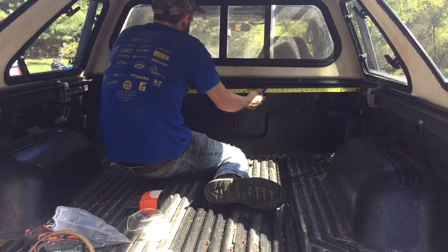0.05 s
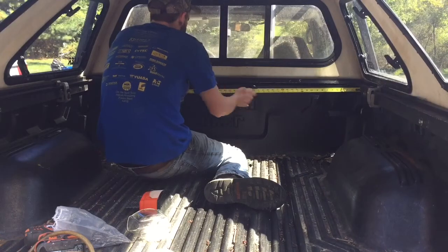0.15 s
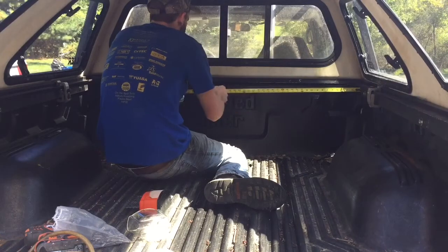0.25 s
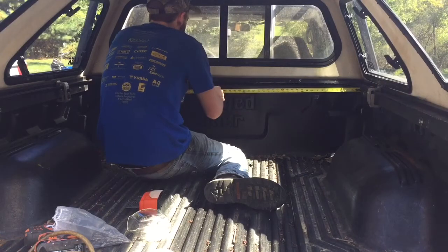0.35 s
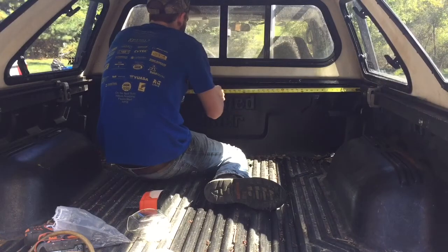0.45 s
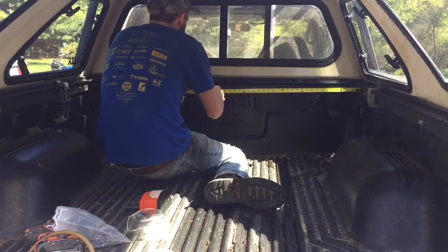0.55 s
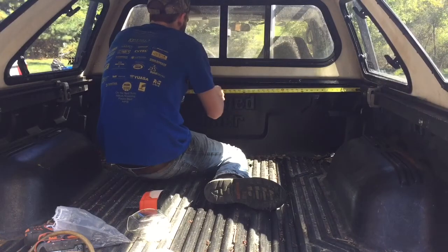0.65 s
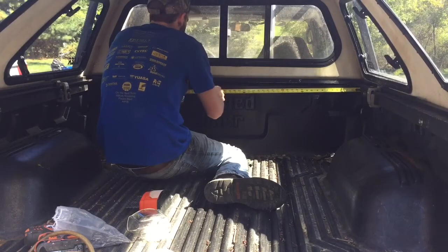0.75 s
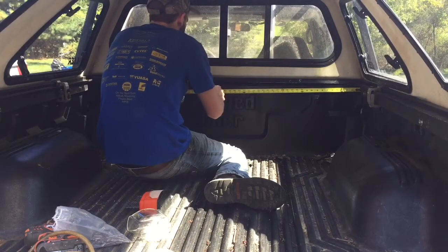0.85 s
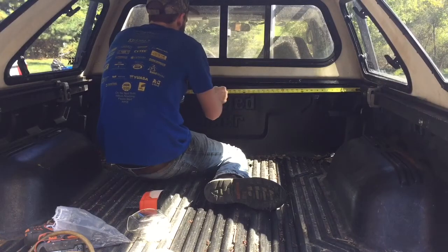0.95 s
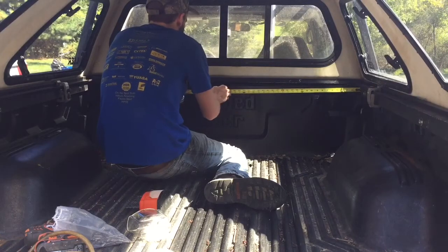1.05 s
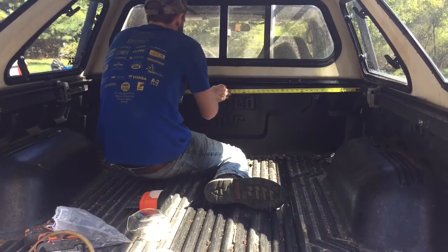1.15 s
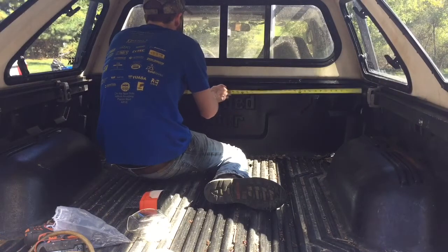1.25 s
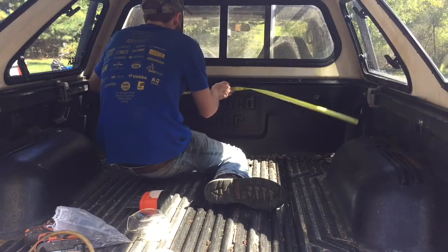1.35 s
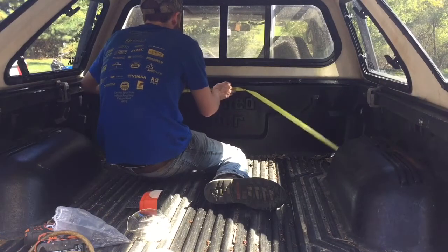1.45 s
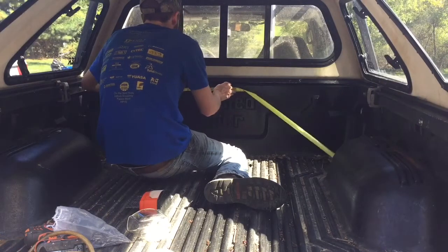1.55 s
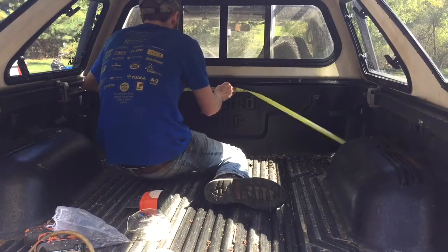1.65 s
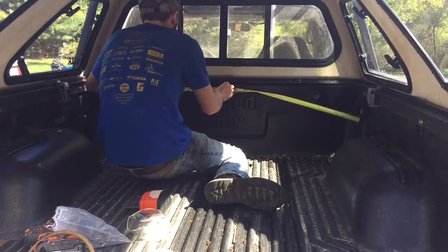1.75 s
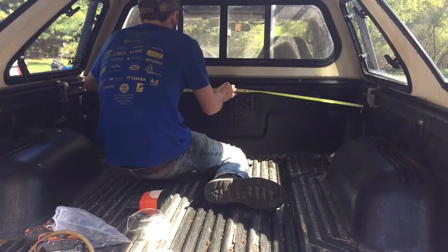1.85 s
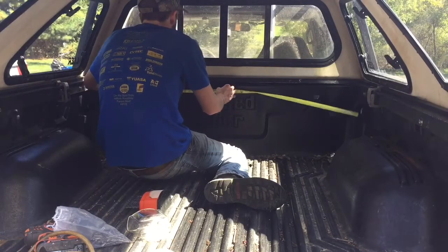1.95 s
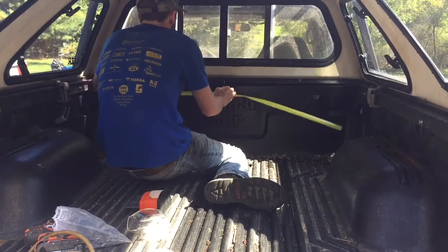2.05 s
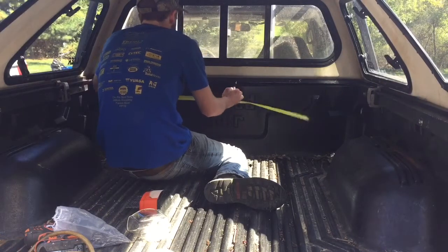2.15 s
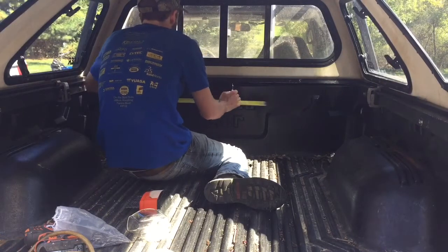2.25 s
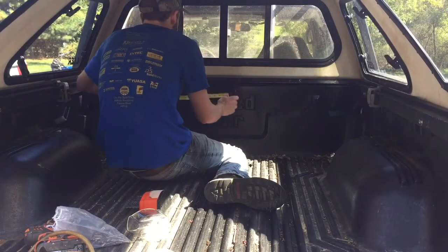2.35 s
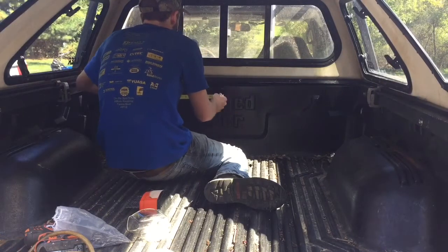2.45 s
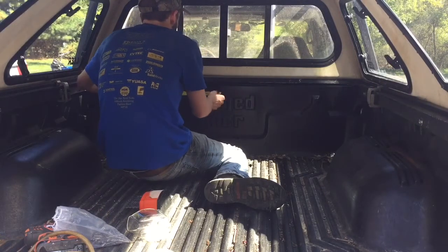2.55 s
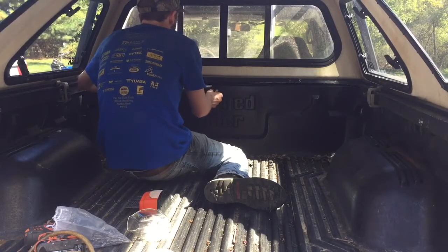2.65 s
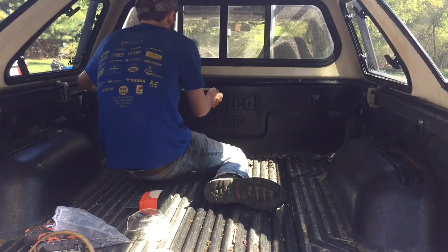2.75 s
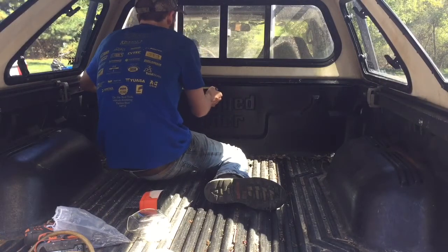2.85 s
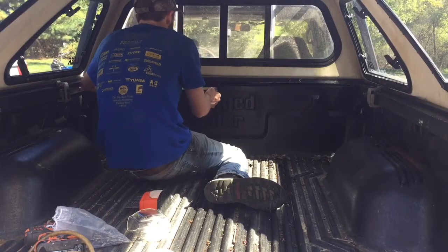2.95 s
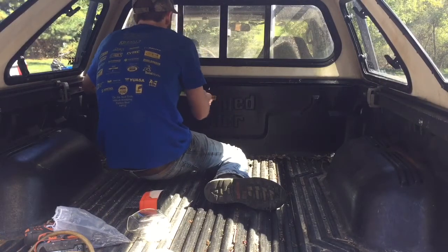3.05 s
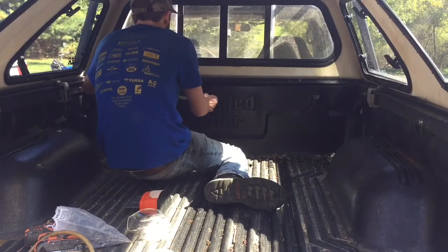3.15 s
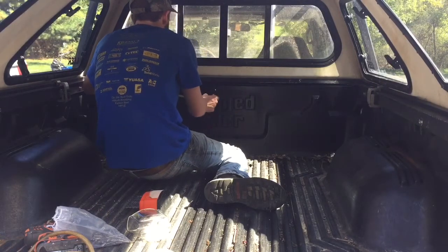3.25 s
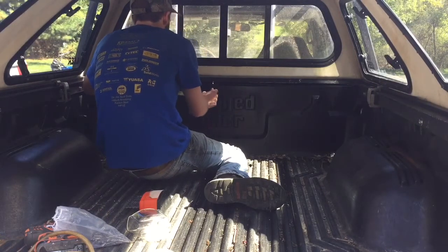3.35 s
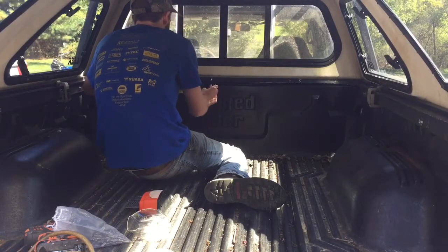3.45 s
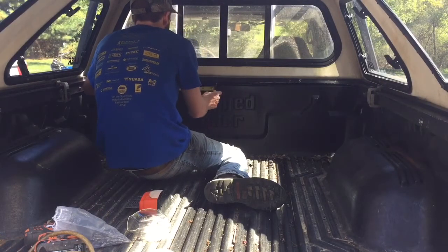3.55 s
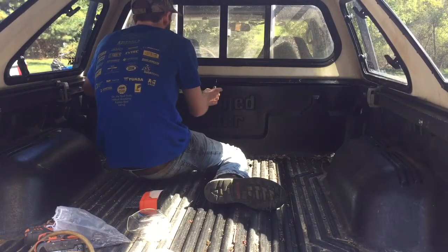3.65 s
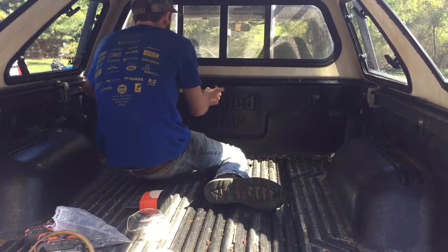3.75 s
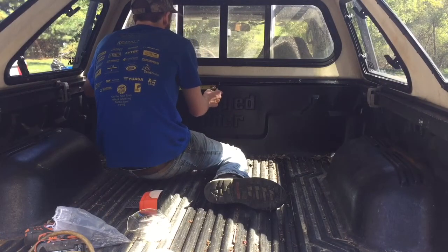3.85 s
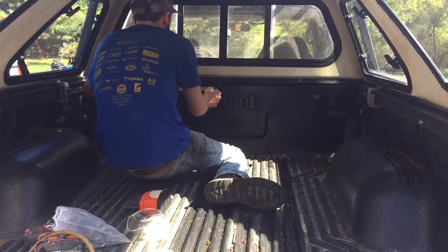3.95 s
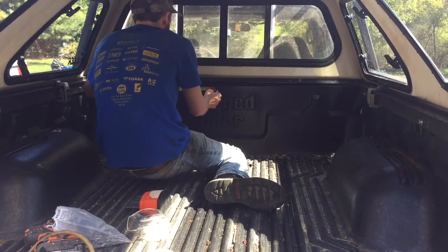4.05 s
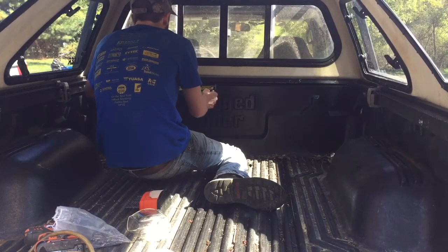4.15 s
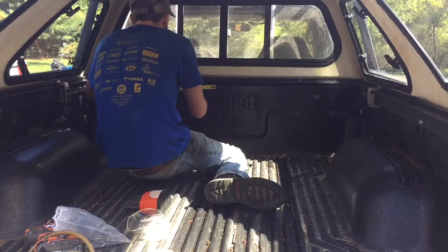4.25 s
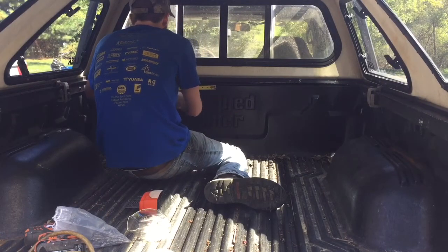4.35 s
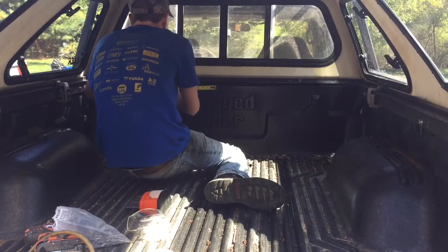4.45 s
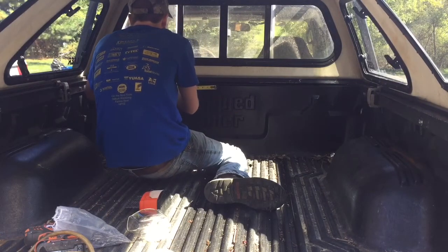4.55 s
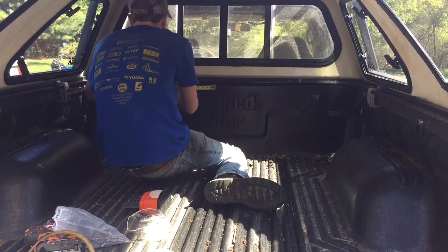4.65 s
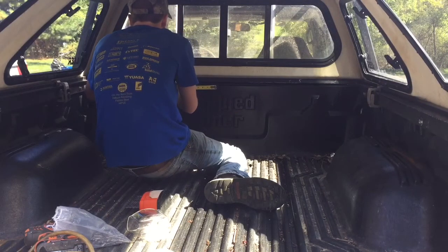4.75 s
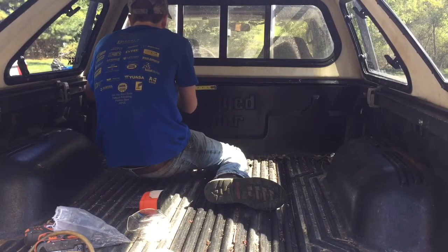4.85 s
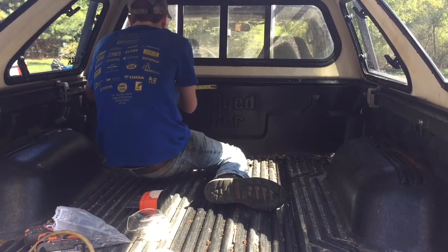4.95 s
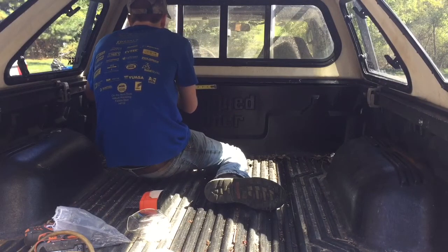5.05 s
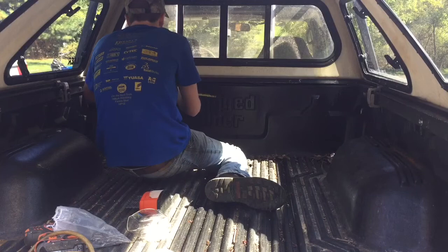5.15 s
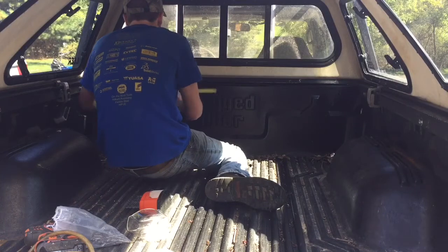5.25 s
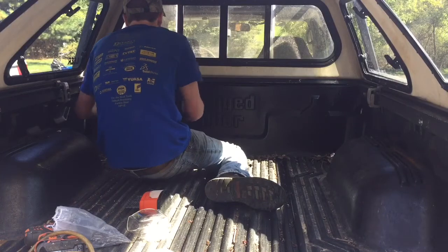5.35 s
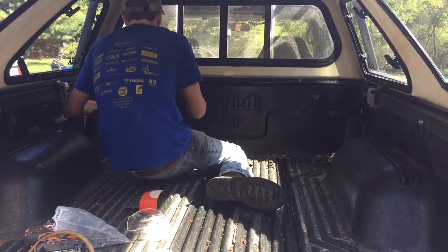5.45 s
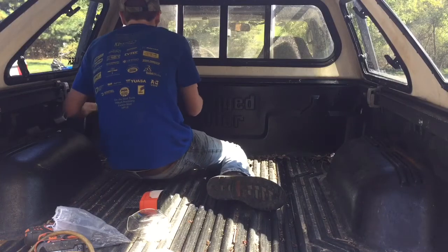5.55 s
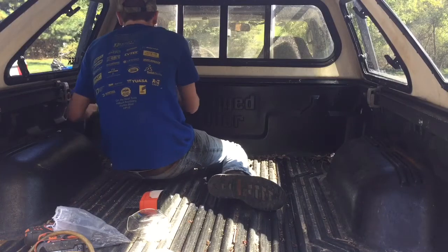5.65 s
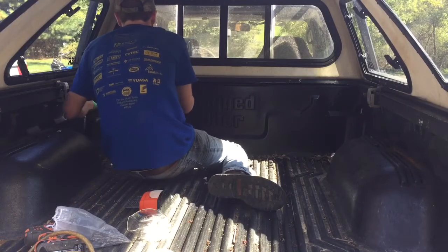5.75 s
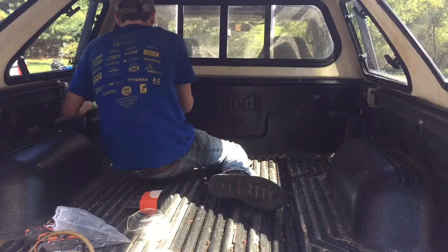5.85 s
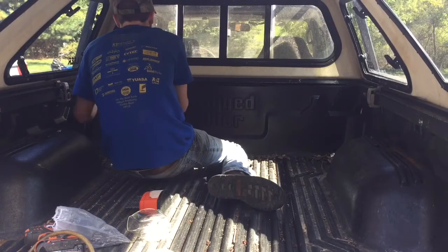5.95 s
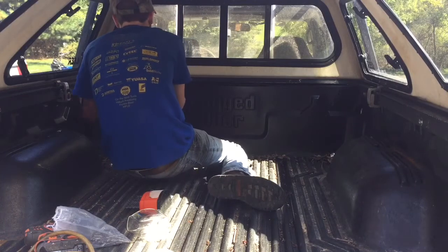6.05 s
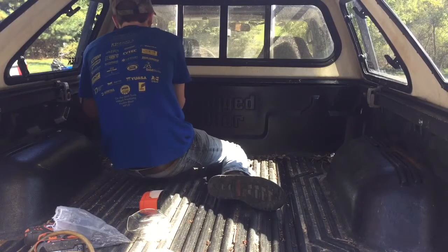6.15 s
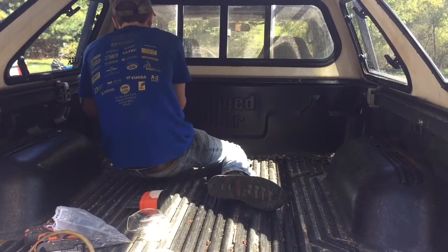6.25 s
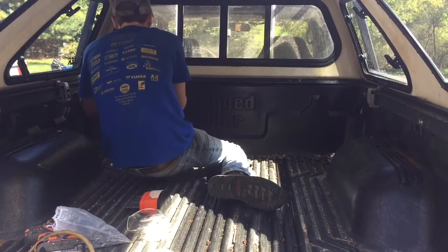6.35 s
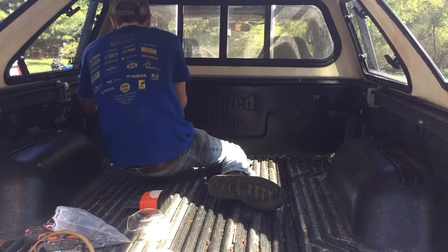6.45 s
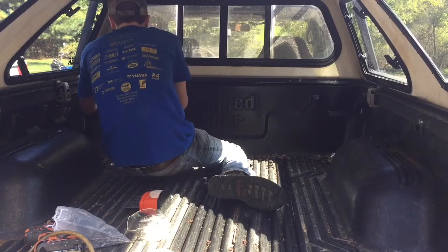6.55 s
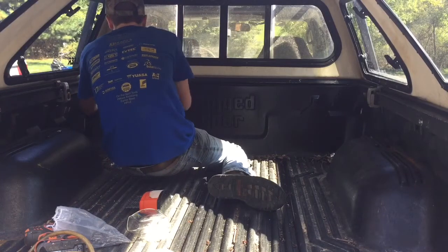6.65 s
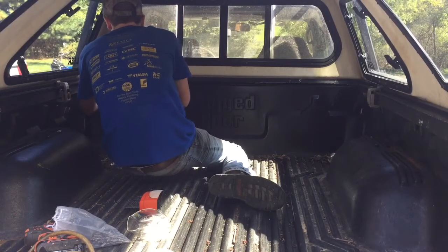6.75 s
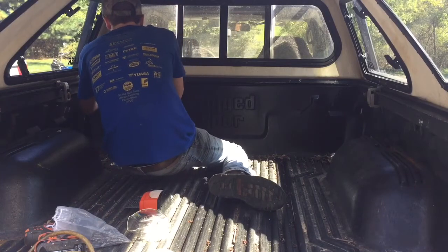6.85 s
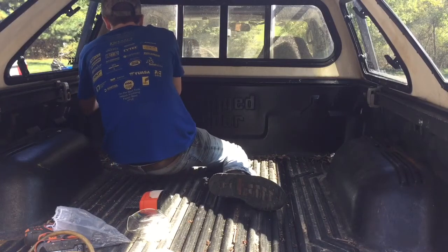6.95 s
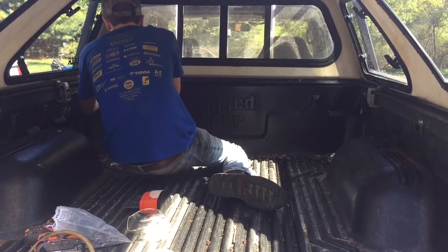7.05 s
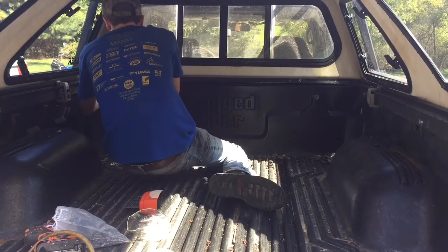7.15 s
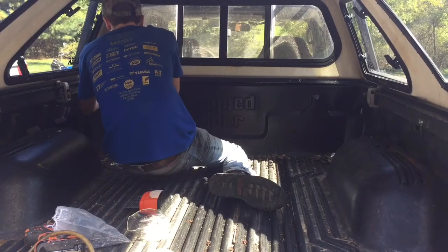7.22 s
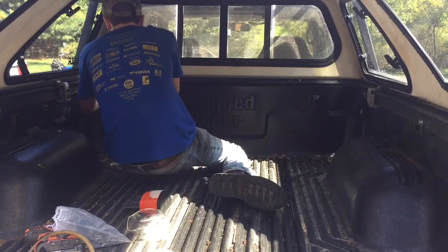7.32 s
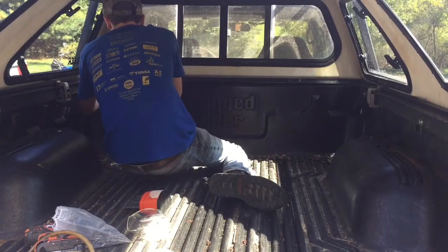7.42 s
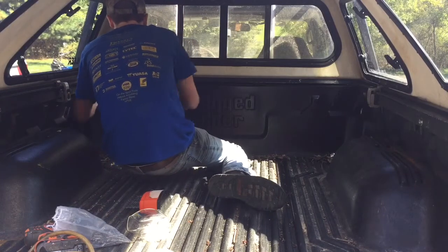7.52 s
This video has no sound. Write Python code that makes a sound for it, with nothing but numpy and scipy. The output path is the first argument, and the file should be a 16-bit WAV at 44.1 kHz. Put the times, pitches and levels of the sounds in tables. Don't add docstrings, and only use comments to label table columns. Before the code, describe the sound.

A small microphone catches a handled tape measure in a hard-walled, briefly reverberant truck bed. Near silence with small finger touches gives way to springy snaps, a rapid steel zip and a loud stop slap. Irregular plastic-and-metal rattling continues, then low floor thumps and more clicks. The case is set down hard, bounces, quiet thumps return, and a last knock ends it.

```python
import sys
import numpy as np
from scipy import signal
from scipy.fft import rfft, irfft
from scipy.io import wavfile

SR = 44100
rng = np.random.default_rng(int(sys.argv[2]) if len(sys.argv) > 2 else 0)


def wrap_up_sound(samples):
    columns = np.atleast_2d(samples).T
    tamed = np.clip(columns, -1, 1)
    steps = np.round(tamed * 32767).astype(np.int16)
    wavfile.write(sys.argv[1], SR, steps)


def invert_db(x):
    u = np.asarray(x, float) / 20
    return 10 ** u


N = 334542

BLADE, HOOK, SHELL, HOLLOW = range(4)


def rms_one(x):
    return x / np.sqrt(np.mean(x ** 2) + 1e-20)


def at_hz(points, hz):
    points = np.array(points)
    return np.interp(np.log(hz), np.log(points[:, 0]), points[:, 1])


def drift(rate_hz):
    r = np.exp(-80 * np.pi * rate_hz / SR)
    noise = rng.standard_normal(N // 40 + 2002)
    slow = signal.lfilter([1], [1, -2 * r, r * r], noise)[2000:]
    return np.interp(np.arange(N) / 40, np.arange(len(slow)), rms_one(slow))


def resonate(x, hz, width_hz):
    r = np.exp(-np.pi * width_hz / SR)
    feedback = [1, -2 * r * np.cos(2 * np.pi * hz / SR), r * r]
    return signal.lfilter([(1 - r * r) / 2, 0, (r * r - 1) / 2], feedback, x + 1e-18)


def air():
    # (frequency [Hz], level per Hz [dB])
    hush_spectrum = [(18, -76.5), (30, -55.5), (81, -1), (153, -5), (189, -3.5), (259, -12), (303, -6),
                     (384, -14), (437, -11.5), (760, -15.5), (1280, -19), (1590, -18), (4910, -26.5),
                     (14800, -31), (16000, -32.5)]
    # (frequency [Hz], width [Hz], level [dB])
    whine_bands = [(5600, 90, -88), (13300, 900, -83.5)]
    hz = np.maximum(np.arange(N // 2 + 1) * SR / N, 1)
    spectrum = rfft(rng.standard_normal(N)) * invert_db(at_hz(hush_spectrum, hz))
    hush = rms_one(irfft(spectrum, N))
    bass = signal.sosfilt(signal.butter(2, 900, fs=SR, output="sos"), hush)
    lumps = invert_db(1.5 * drift(3.3)) - 1
    out = invert_db(-66) * (hush + bass * lumps)
    for band_hz, width_hz, db in whine_bands:
        once = resonate(rng.standard_normal(N), band_hz, width_hz)
        out += invert_db(db) * rms_one(resonate(once, band_hz, width_hz))
    return out


def thumps():
    # (time [s], peak
    # level [dB], pitch [Hz])
    body_pushes = [(4.234, -38.5, 133), (4.45, -58, 85.6), (4.576, -50, 124.6), (4.606, -34, 151),
                   (4.709, -43.5, 111), (4.763, -47, 105), (4.737, -32, 126), (4.923, -34.5, 211),
                   (4.945, -37, 116), (5.105, -57, 151), (5.185, -43.5, 96), (5.212, -43, 100),
                   (5.638, -43, 153), (5.703, -41, 215), (5.802, -43, 116.2), (6.141, -55, 105),
                   (6.7, -38, 108), (6.741, -34, 138), (6.803, -43, 133.5), (6.844, -51, 86.1),
                   (6.864, -55, 140), (6.904, -43, 112), (6.931, -43, 110), (6.977, -64, 95),
                   (7.15, -50.5, 154.3), (7.199, -55, 140), (7.239, -56, 222), (7.277, -38, 135),
                   (7.312, -45.5, 117), (7.535, -44, 108)]
    # (time [s], peak level [dB])
    panel_jolts = [(0.02, -58.5), (0.815, -57.5), (1.061, -52), (1.1, -55), (1.309, -46), (1.37, -49),
                   (1.439, -52), (2.359, -49), (7.525, -47), (2.25, -57), (4.203, -51), (5.378, -45.5)]
    panel_hz, panel_t60_s = 234, 0.08
    firm_db, firm_t60_s, longer_s_per_db = -32.5, 0.032, 0.0017
    swings = [(s, db, hz, firm_t60_s + longer_s_per_db * (firm_db - db)) for s, db, hz in body_pushes]
    swings += [(s, db, panel_hz, panel_t60_s) for s, db in panel_jolts]

    out, t = np.zeros(N + 8192), np.arange(8192) / SR
    push = (1 - np.exp(-t / 0.005)) ** 2
    sagging_time = t + 0.00096 * (1 - np.exp(-t / 0.004))
    for s, db, hz, t60_s in swings:
        swing = np.sin(2 * np.pi * hz * sagging_time)
        decay = invert_db(-60 * t / np.clip(t60_s, 0.02, 0.4))
        out[round(s * SR):][:8192] += invert_db(db + 13.5) * push * decay * swing
    return out[:N]


def ticks():
    # (time [s], peak level [dB])
    finger_moves = [
        (0.021, -60),
        (0.148, -58.5),
        (0.376, -58),
        (0.705, -56),
        (0.82, -54),
        (4.298, -53.5),
        (7.43, -61.5),
    ]
    force, t = np.zeros(N + 2048), np.arange(2048) / SR
    swell = (1 - np.exp(-t / 0.0039)) * invert_db(-60 * t / 0.045)
    for s, db in finger_moves:
        force[round(s * SR):][:2048] += invert_db(db + 7.5) * swell
    return force[:N]


def touch_levels(steel_db, case_db, hollow_db, hook_share):
    hook_db = steel_db + hook_share * (case_db - steel_db)
    return steel_db, hook_db, case_db, case_db + hollow_db


def rubs(which):
    # (start [s], length [s], steel level [dB], case level [dB], sag over the stroke [dB])
    blade_slides = [(0.025, 0.028, -58.5, -69, 17), (1.045, 0.032, -59, -70, 7),
                    (1.225, 0.069, -65, -68.5, 6), (1.277, 0.012, -61, -64, -6),
                    (1.335, 0.073, -39.5, -49.5, 9.5), (1.43, .07, -53.5, -65, 6.5),
                    (1.51, 0.026, -64, -67, -2.5), (1.549, 0.029, -47, -63.5, -5.5),
                    (1.585, 0.042, -48, -67.5, 3), (1.95, .04, -68, -79.5, -10),
                    (1.99, 0.12, -56, -62, -5.5), (2.115, 0.041, -46, -61, -16.5),
                    (2.163, 0.032, -31.5, -43.5, 13), (2.215, 0.042, -36.5, -48.5, 12),
                    (2.3, 0.055, -43.5, -56.5, 5.5), (2.36, 0.041, -46, -79, -7),
                    (2.405, 0.087, -47, -72, 23)]
    shell_scuffs = [(2.55, 0.034, -50, -36.5, 15), (2.58, 0.037, -57, -44.5, -10.5),
                    (2.62, 0.069, -45, -31.5, 8), (3.09, 0.06, -49, -32.5, 19.5),
                    (3.15, .015, -57, -42.5, -9), (3.214, .012, -55, -49, -16.5),
                    (3.36, 0.076, -75, -40, 20), (3.62, 0.068, -69, -46.5, -3.5),
                    (3.682, 0.049, -42, -33, 42), (3.73, .015, -70, -51, 14),
                    (2.905, 0.011, -68, -45.5, -3.5), (3.815, 0.035, -72, -36, 20.5),
                    (3.85, .018, -54, -46, -10), (3.868, 0.036, -48.5, -32.5, 9),
                    (3.987, 0.036, -53, -38, 19.5), (4.08, 0.039, -79, -39.5, 25),
                    (5.175, 0.047, -55.5, -44, -2), (5.25, 0.026, -71, -47.5, -4.5),
                    (5.315, 0.029, -62, -38, 0), (5.355, 0.036, -72, -41, 27.5),
                    (6.33, 0.031, -75.5, -70, -5)]
    palm_drags = [
        (1.05, 0.049, -83, -61, 11),
        (1.325, 0.027, -75, -55.5, 8),
        (2.74, 0.084, -71, -51, 14),
        (2.94, 0.06, -74, -51, 25),
        (5.14, 0.044, -87, -70.5, -9),
        (6.214, 0.069, -77, -63.5, 0),
        (6.285, 0.022, -78, -70, 8),
    ]
    liner_skids = [
        (5.718, 0.042, -30.5, -26, 12),
        (5.79, 0.045, -54, -47.5, 14),
        (7.538, .05, -49.5, -33, 7),
    ]
    kinds = [(blade_slides, 7.5), (shell_scuffs, -2.5), (palm_drags, 13.5), (liner_skids, -7.5)]

    force, t = np.zeros(N + 8192), np.arange(8192) / SR
    fade_in = np.minimum(t / 0.004, 1)
    for strokes, hollow_db in kinds:
        for s, length_s, steel_db, case_db, sag_db in strokes:
            db = touch_levels(steel_db, case_db, hollow_db, hook_share=0.35)[which]
            sag = -sag_db * np.minimum(t / length_s, 1)
            die_away = -60 * np.maximum(t - length_s, 0) / 0.059
            force[round(s * SR):][:8192] += fade_in * invert_db(db + sag + die_away)
    return force[:N]


def contacts(which, rise_s, stretch):
    # (time [s], steel level [dB], case level [dB], chatter t60 [s])
    blade_flicks = [
        (0.7843, -44.5, -59, 0.028),
        (1.2931, -18, -45.5, 0.085),
        (1.3217, -20.5, -54, 0.041),
        (1.393, -36.5, -53.5, 0.022),
        (1.778, -60, -59, .027),
        (2.383, -33, -60, 0.017),
        (2.3987, -31.5, -67, 0.015),
        (2.4892, -35, -66.5, .016),
        (7.1934, -46.5, -65, 0.026),
    ]
    stop_slaps = [(2.2579, 1, -11.5, 0.013), (2.2776, -14.5, -22.5, 0.024), (2.338, -41, -57, .012),
                  (3.1699, -20, -25, 0.017), (3.3744, -62, -34, .0094), (3.6074, -32, -28, 0.011),
                  (5.4335, -17.5, -32, 0.033), (3.896, -36, -45, .012), (5.275, -51, -50, .012),
                  (5.429, -26, -31.5, .01), (5.331, -36, -43, .02)]
    liner_knocks = [
        (5.65, -58, -64.5, 0.037),
        (5.7033, -4.5, -11, 0.012),
        (5.736, -24.5, -33.5, .012),
        (5.7735, -17, -22.5, 0.012),
        (5.8368, -42, -57, 0.027),
        (5.894, -45, -69, 0.026),
        (5.926, -56, -76, 0.018),
        (5.957, -49, -74.5, 0.018),
        (7.5245, -16, -20.5, .017),
    ]
    hand_rattles = [(1.9941, -76, -36, 0.012), (2.1961, -14.5, -23, 0.018), (2.522, -18, -18.5, 0.018),
                    (2.7139, -35.5, -26, 0.024), (2.8228, -61, -31.5, 0.056), (2.9173, -31.5, -25.5, 0.013),
                    (3.0666, -24.5, -27, 0.036), (3.231, -27.5, -28.5, 0.033), (3.3037, -54, -49, 0.044),
                    (3.3404, -67, -24.5, 0.02), (3.4457, -61, -23, .019), (3.495, -14.5, -19.5, 0.016),
                    (3.5468, -34, -27.5, .02), (3.5777, -28, -28.5, 0.026), (3.5928, -33, -28, 0.021),
                    (3.639, -44, -34, 0.025), (4.1604, -25.5, -27.5, 0.013), (4.3384, -67, -53.5, 0.026),
                    (4.9204, -42.5, -41.5, 0.032), (4.9641, -43.5, -36, 0.028), (5.037, -41.5, -36, 0.015),
                    (5.239, -35.5, -17.5, 0.0075), (5.2981, -26, -22.5, 0.022), (6.127, -36.5, -34, 0.016),
                    (6.358, -57.5, -54.5, 0.025)]
    padded_taps = [
        (0.0728, -70.5, -71, 0.018),
        (0.9464, -70, -65, 0.02),
        (2.6117, -41, -52, .0098),
        (2.7945, -55, -49, .0083),
        (3.1485, -39, -46.5, 0.0077),
        (6.51, -75, -79, 0.016),
        (7.3683, -70, -76, 0.016),
    ]
    kinds = [(blade_flicks, 6.5), (stop_slaps, -12.5), (liner_knocks, -20.5),
             (hand_rattles, -3), (padded_taps, 22)]

    force, t = np.zeros(N + 4096), np.arange(4096) / SR
    for hits, hollow_db in kinds:
        for s, steel_db, case_db, t60_s in hits:
            db = touch_levels(steel_db, case_db, hollow_db, hook_share=0.45)
            fall = invert_db(db[which] - 60 * t / (stretch * np.clip(t60_s, 0.004, 0.06)))
            softness = 1 + np.clip((db[HOLLOW] - db[HOOK]) / 4, 0, 4)
            rise = 1 - np.exp(-t / (rise_s * softness))
            force[round(s * SR):][:4096] += rise * fall
    return force[:N]


def grit(count, per_s, spread_db):
    sizes = invert_db(spread_db * np.minimum(rng.exponential(1, count), 3))
    signed = sizes * rng.choice([-1, 1], count)
    return rms_one(signed * (rng.random(count) < per_s / SR)) + 1e-18


def body(x, modes, scatter_db):
    power, out = 0, 0
    for k, (hz, width_hz, db) in enumerate(modes):
        power += invert_db(2 * db) * np.pi * width_hz / SR
        share = invert_db(db + scatter_db * drift(7.9))
        out = out + resonate(x * share, hz, width_hz) * (-1) ** k
    return out / np.sqrt(power)


def tape_measure():
    # (frequency [Hz], width [Hz], level [dB])
    blade_modes = [(7700, 1000, -2), (8500, 1000, -1), (9400, 1200, -1), (10400, 1400, -1),
                   (11600, 1600, -1), (13000, 1800, -1), (14400, 1800, -2), (15600, 1200, -4)]
    hook_modes = [(3780, 400, -1), (4050, 400, 0), (4450, 450, -1), (4950, 500, 0), (5500, 650, -2),
                  (6100, 750, -2), (6800, 850, -2)]
    shell_modes = [(1264, 75, 0), (1437, 110, -2), (1584, 260, -7.5), (1939, 130, -1.5), (2280, 240, -9),
                   (2604, 160, -1), (2780, 710, -2), (2939, 160, -1.5), (3300, 170, -11)]
    hollow_modes = [(215, 13, -4), (359, 130, -10), (474, 75, -0.5), (624, 46, 3), (774.5, 128, -1.5),
                    (871, 110, -1.5), (1134, 303, -13.5)]
    judder = invert_db(2.3 * drift(120))
    blade = invert_db(2.5) * contacts(BLADE, rise_s=0.00042, stretch=1.0) + invert_db(2.0) * rubs(BLADE) * judder
    hook = invert_db(1.0) * contacts(HOOK, rise_s=0.0012, stretch=1.9) + invert_db(-1.0) * rubs(HOOK) * judder
    shell = invert_db(1.0) * contacts(SHELL, rise_s=0.00058, stretch=2.07) + invert_db(-1.5) * rubs(SHELL) * judder
    hollow = invert_db(3.5) * contacts(HOLLOW, rise_s=0.00059, stretch=1.99) + invert_db(-2) * rubs(HOLLOW) * judder
    hollow += ticks()

    steel = grit(count=N, per_s=12000, spread_db=-0.5)
    plastic = grit(count=N, per_s=9000, spread_db=4.0)
    wander_db = 1.3
    out = body(blade * steel[::-1], blade_modes, wander_db / 2)
    out += body(hook * steel, hook_modes, wander_db)
    out += body(shell * plastic, shell_modes, wander_db)
    return out + body(hollow * plastic, hollow_modes, wander_db)


def load_bed(x, wet_db, first_s):
    # (frequency [Hz], t60 [s])
    bed_decay = [(100, 0.9), (400, 0.19), (1000, 0.12), (3000, 0.11), (8000, 0.048), (16000, 0.12)]
    t = np.arange(SR // 3) / SR
    edges_hz = 60 * 2 ** np.arange(0, 8.6, 0.5)
    tail = np.zeros(len(t))
    for low, high in zip(edges_hz, edges_hz[1:]):
        band = signal.butter(2, [low, high], "band", fs=SR, output="sos")
        noise = signal.sosfilt(band, rng.standard_normal(len(t)))
        tail += noise * invert_db(-60 * t / at_hz(bed_decay, np.sqrt(low * high)))
    tail *= np.clip(t / first_s - 1, 0, 1)
    tail /= np.sqrt(np.sum(tail ** 2))
    return x + invert_db(wet_db) * signal.fftconvolve(x, tail)[:N]


def scene():
    tape = load_bed(tape_measure(), wet_db=-6.5, first_s=0.0016)
    floor = load_bed(thumps(), wet_db=-17.5, first_s=0.0013)
    return (tape + floor + air())[None]


def band_limit(x):
    return signal.sosfilt(signal.butter(12, 17020, fs=SR, output="sos"), x)


def record(dry):
    x = signal.sosfilt(signal.butter(1, 60, "high", fs=SR, output="sos"), dry)
    x = np.tanh(x)
    below_step = signal.sosfilt(signal.cheby2(20, 50, 16050, fs=SR, output="sos"), x)
    x = 1.258 * below_step + 0.07 * x
    x = signal.sosfilt(signal.cheby2(12, 60, 17300, fs=SR, output="sos"), x)
    return band_limit(x)


dry = scene()
out = record(dry)
wrap_up_sound(out)
```